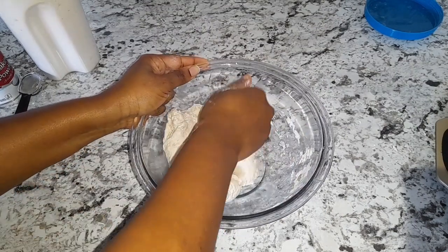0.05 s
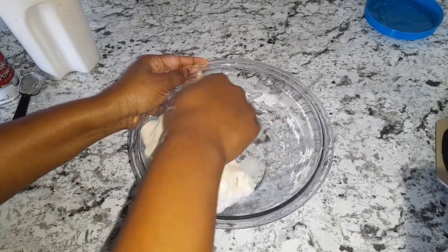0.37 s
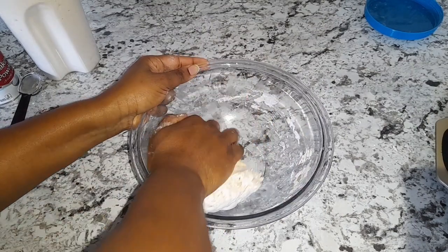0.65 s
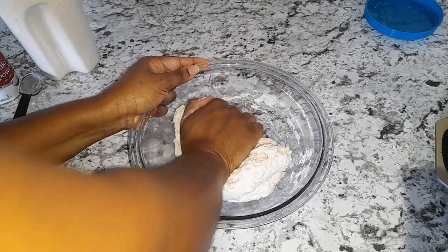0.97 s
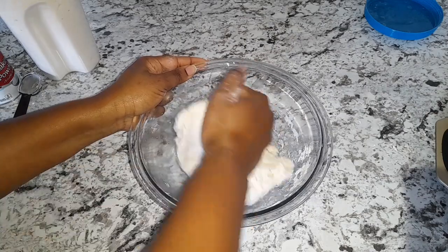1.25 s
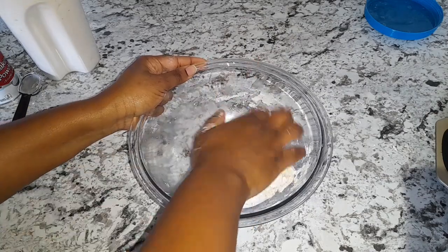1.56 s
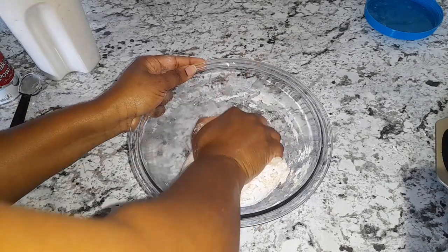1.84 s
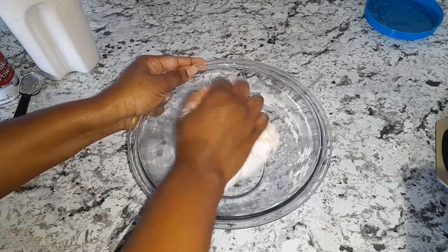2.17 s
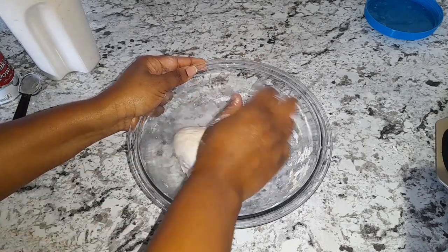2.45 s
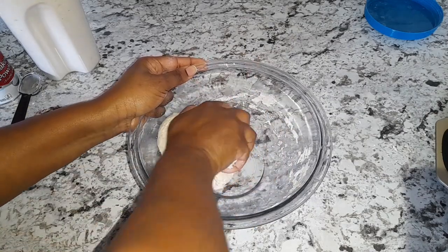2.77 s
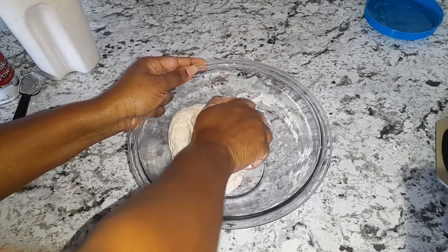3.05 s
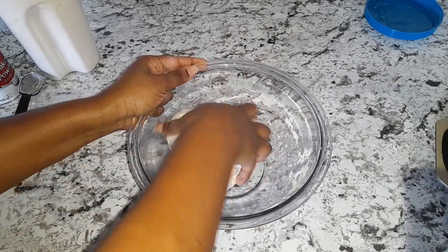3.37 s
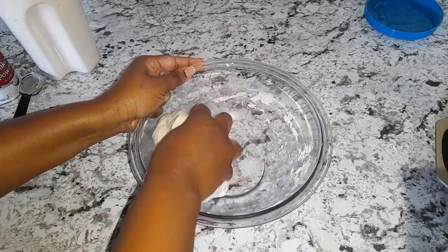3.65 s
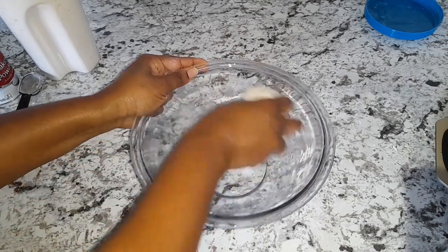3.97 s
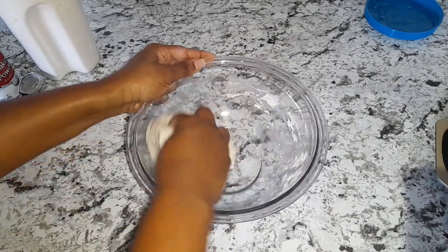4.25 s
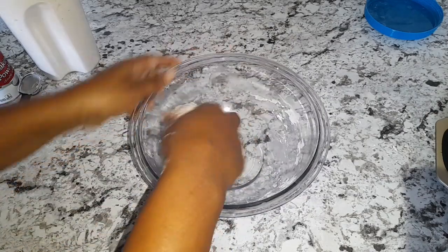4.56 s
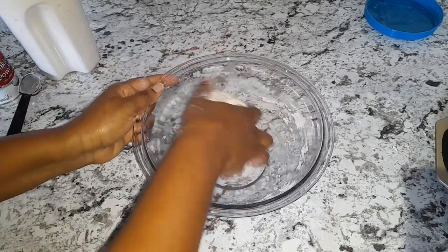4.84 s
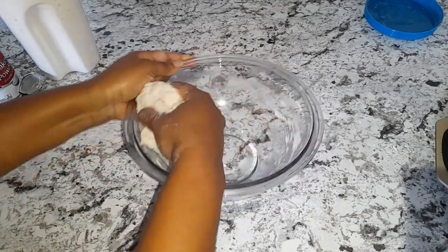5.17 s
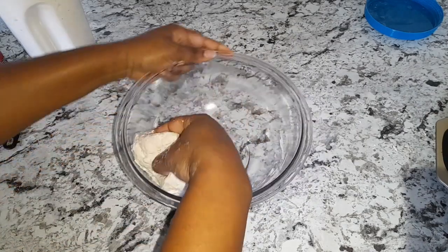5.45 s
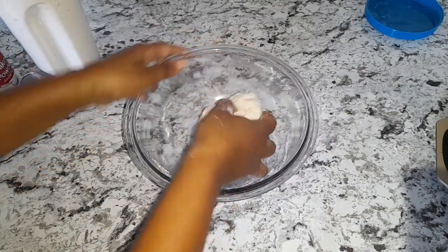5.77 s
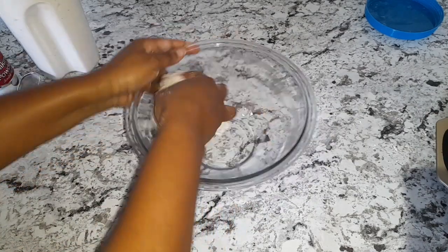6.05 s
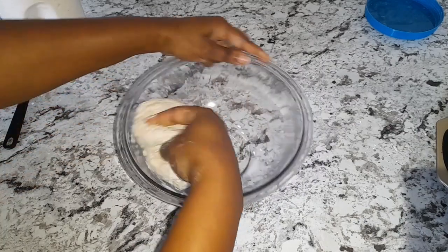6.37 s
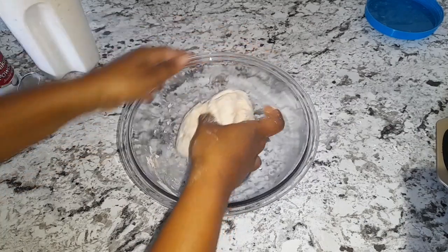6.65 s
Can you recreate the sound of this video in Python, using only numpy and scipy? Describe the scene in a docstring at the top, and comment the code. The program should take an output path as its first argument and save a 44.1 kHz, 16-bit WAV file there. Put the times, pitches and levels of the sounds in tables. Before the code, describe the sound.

Hands knead soft dough in a glass bowl, with dull thuds on the counter, floury rubbing and small sticky ticks.

```python
"""Kneading dough in a glass bowl

Floury skin rubs, scrapes and ticks on the glass; soft dough drags and peels off, close to a stereo mic.
The bowl creeps over a stone counter and thuds on it, slapping air from under the dough.
A slipping fingertip squeaks; the rim rings faintly when caught. Small kitchen, appliance humming."""
import sys
import numpy as np
from scipy import signal
from scipy.fft import rfft, irfft, next_fast_len
from scipy.io import wavfile
from scipy.ndimage import map_coordinates

SR = 44100
rng = np.random.default_rng(int(sys.argv[2]) if len(sys.argv) > 2 else 0)


def inscribe(sig):
    """Save sig as 16-bit PCM at rate SR to the path in sys.argv[1].

    A 1-D sig is mono; a 2-D sig holds one channel per row.
    Samples are clipped to [-1, 1] before scaling.
    """
    pcm = np.round(np.clip(np.atleast_2d(sig).T, -1, 1) * 32767)
    wavfile.write(sys.argv[1], SR, pcm.astype(np.int16))


N = 295470

# hand sliding dough over glass: (start [s], rise [s], fall [s], skin hiss [dB], dough drag [dB])
STROKES = [(0, 0.032, 0.47, -51.5, -59.5), (.14, 0.21, 0.17, -51.5, -61), (.5, 0.23, 0.12, -64, -64.5),
           (.76, 0.14, 0.36, -65, -72.5), (1.043, 0.039, 0.25, -50.5, -67), (1.32, 0.027, 0.11, -65, -84),
           (1.53, .04, 0.032, -67, -82), (1.647, .02, 0.077, -59, -63.5), (1.72, 0.019, 0.094, -64, -68),
           (1.805, 0.051, 0.3, -62, -62.5), (2.07, 0.017, 0.43, -56.5, -59), (2.74, 0.16, .16, -67, -86),
           (3.108, 0.049, 0.031, -46, -49.5), (3.15, 0.061, 0.085, -46.5, -55),
           (3.366, 0.0097, 0.16, -58, -66), (3.51, 0.1, 0.24, -54.5, -66), (3.63, 0.1, 0.12, -49.5, -60.5),
           (3.83, 0.24, 0.3, -52.5, -59.5), (4.17, 0.014, .03, -73, -57), (4.26, 0.24, 0.4, -61.5, -64.5),
           (4.79, 0.11, 0.15, -66.5, -69.5), (4.99, 0.13, 0.88, -60, -66.5),
           (5.599, 0.055, 0.047, -58, -55), (5.66, .1, 0.18, -68, -68.5),
           (5.88, 0.062, 0.092, -63.5, -68.5), (5.93, .19, 0.37, -61.5, -60), (6.29, .06, 0.19, -66, -56),
           (6.38, 0.1, 0.32, -66.5, -67.5)]
# dough peeling off: (release [s], pull [s], t60 [s], skin hiss [dB], dough drag [dB])
PEELS = [(1.164, 0.091, .31, -42.5, -44.5), (2.159, 0.076, 0.17, -38, -43),
         (2.955, 0.064, 0.32, -49.5, -71)]
SKIN_SPECTRUM = [(1470, -25), (2500, -11.5), (4260, -0.5), (4560, -1.5), (6510, -1), (7650, 0),
                 (13600, 4.5), (15000, 1.5), (15800, -51)]  # skin on glass: (frequency [Hz], level [dB])
DRAG_SPECTRUM = [(40, -9), (150, 10), (400, 0.5), (750, 6), (1250, 1), (1800, 0), (3100, -6), (5500, -10),
                 (10000, -28)]  # dough on glass: (frequency [Hz], level [dB])
SCRAPES = [(0, 0.043, 0.38, -64), (.51, 0.19, 0.15, -62), (1.82, 0.13, .2, -63), (2.2, 0.072, 0.093, -68),
           (2.45, 0.071, 0.15, -75), (3.415, 0.022, 0.084, -55), (3.55, 0.22, .1, -61.5),
           (4.8, .1, .12, -74), (6.3, 0.18, 0.44, -72.5)]  # bare skin on the wall: (start [s], rise [s], fall [s], level [dB])
WALL_MODES = [(1240, 130, -2), (2340, 940, -3), (3830, 460, -2)]  # glass damped by hand and dough: (frequency [Hz], width [Hz], level [dB])
SHIFTS = [(0, 0.49, -55.5), (0.776, 0.72, -57.5), (1.81, 0.21, -56.5), (2.2, 0.15, -64), (2.824, 0.26, -66),
          (3.53, 0.83, -54), (3.893, 0.19, -48.5), (4.535, 0.5, -57), (5.093, 0.29, -47.5),
          (5.88, 0.3, -54.5), (6.26, 0.24, -54)]  # bowl creeping: (start [s], length [s], level [dB])
RUMBLE_SPECTRUM = [(20, -25), (45, 11), (80, -13), (180, 4), (300, 7), (450, -3.5), (750, -10.5),
                   (1400, -24), (4000, -59)]  # bowl's foot on stone: (frequency [Hz], level [dB])
AIR_SPECTRUM = [(25, -36), (52, 4), (85, -15), (130, -8), (260, 2), (380, -6.5), (460, -3), (700, -9),
                (1100, -21), (1600, -29), (3500, -38.5), (8000, -37), (13500, -27.5), (15800, -47)]  # room air: (frequency [Hz], level [dB])
HUM_PARTIALS = [(60, -75), (120, -80.5), (240, -78.5), (283, -70.5), (465, -64), (700, -70)]  # appliance: (frequency [Hz], level [dB])
TICKS = [(.0712, -48, -38.5), (.2844, -33, -52), (.9462, -48, -63), (1.1495, -37, -41), (1.1557, -37, -31),
         (1.8455, -47, -44.5), (2.1535, -30, -32), (2.1565, -26, -29), (2.1616, -26, -26.5),
         (2.3977, -52, -68), (3.119, -40, -58), (3.1472, -35, -49), (4.0392, -36, -45), (4.1793, -52, -46),
         (4.9352, -46, -65), (5.0557, -64, -51), (5.7482, -45.5, -55), (6.5284, -44, -64)]  # flour and sticky dough letting go: (time [s], crack [dB], tap [dB])
CRACK_SPECTRUM = [(300, -11), (2600, -6.5), (15000, 10)]  # bright crack of dough: (frequency [Hz], level [dB])
TAP_SPECTRUM = [(300, -7), (1250, 4), (2600, -3.5), (4200, -8), (9000, -16)]  # dull tap on glass: (frequency [Hz], level [dB])
# landings, low bounce = soft contact: (time [s], level [dB], bounce [Hz], slap trim [dB], boom trim [dB])
LANDINGS = [(.685, -27, 228, -6, 3), (.711, -23.5, 327, -8, 1), (1.153, -44, 200, -9, 10),
            (1.66, -34, 182, -16, -8), (1.725, -45, 160, 3.5, 9), (2.145, -39.5, 261, -22, 8),
            (2.304, -52, 102, -12, 15), (3.001, -34, 219, -18, -1), (3.138, -39, 312, 1, -2),
            (3.2, -37.5, 155, -7, 4), (3.3746, -29.5, 177, -12.5, 6), (3.427, -26, 506, -7, 8),
            (3.502, -24, 210, -14.5, -1), (3.8193, -3, 345, -8.5, -6), (3.838, -22.5, 228, -22, 4),
            (3.9139, -26.5, 211, -19, 5), (4.429, -32, 225, -11.5, -3), (4.4604, -23.5, 342, -16, -8),
            (4.4856, -21, 230, -14.5, -3), (4.861, -39.5, 176, -17, 8), (5.3581, 1, 317, -9.5, -12),
            (5.387, -8, 200, -6, -5), (5.6201, -12.5, 310, -8.5, -3), (5.6639, -28.5, 156, -9.5, 9),
            (6.289, -37, 123, -20, 1)]
BOWL_MODES = [(181.3, 5.5, 0.18), (208.3, 6.5, 0.069), (292.5, 0.5, 0.11), (398.3, -5.5, 0.083),
              (477, -44, 0.175), (518.4, -6, 0.083), (616, -20, 0.081), (856, -44, .09),
              (1074, -18.3, 0.15), (1350, -17, 0.14)]  # loaded bowl on the counter: (frequency [Hz], level [dB], t60 [s])
COUNTER_MODES = [(45.1, -21, 0.41), (57.3, -11.5, 0.201), (105.8, -24.5, 0.41)]  # counter and cabinet: (frequency [Hz], level [dB], t60 [s])
SLAP_SPECTRUM = [(30, -29), (100, 0), (350, -3.5), (550, -6.5), (800, -15), (1500, -24.5), (3000, -36.5),
                 (6000, -41), (10000, -46), (15000, -52)]  # air from under the dough: (frequency [Hz], level [dB])
SQUEAKS = [(2.977, -37, 4050), (3.586, -44.5, 3750)]  # fingertip slips: (time [s], level [dB], pitch [Hz])
# fingers catching the rim: (time [s], level [dB], t60 left by the grip [ratio], contact corner [Hz])
RIM_CATCHES = [(3.428, -51.5, 0.17, 6000), (4.454, -62, 0.45, 7000), (4.495, -60, 0.59, 4050),
               (4.562, -60.5, 0.64, 9000), (6.648, -61, 1, 1100)]
GLASS_MODES = [(1320, -5.5, 0.8), (2486, -2.5, 0.67), (3730, -2, 0.39), (5380, 3, 0.42), (7300, -3, 0.27),
               (9050, -8, .2)]  # free glass wall: (frequency [Hz], level [dB], t60 [s])
ROOM_DECAY = [(100, 0.41), (300, 0.53), (1000, 0.53), (4000, 0.48), (14000, 0.088)]  # kitchen reverb: (frequency [Hz], t60 [s])
ROOM_GAIN = [(50, -5.5), (170, -13), (320, -9.5), (1000, -6.5), (3000, -3.5), (6000, -10), (14000, -5.5)]  # reverb over its input: (frequency [Hz], gain [dB])
MIC_COHERENCE = [(60, 0.91), (290, 0.89), (640, 0.36), (1400, 0.087), (3000, 0.19), (15000, 0)]  # left-right likeness: (frequency [Hz], correlation [ratio])
MIC_BALANCE = [(60, -3.5), (200, -0.5), (600, 2), (1200, -1), (4400, 0), (8000, -0.5), (15000, 5.5)]  # port colour: (frequency [Hz], left minus right [dB])


def amp(db):
    """Decibels to gain."""
    return 10 ** (np.asarray(db) / 20)


def unit(x):
    """Scale to rms 1."""
    return x / np.sqrt(np.mean(x ** 2) + 1e-20)


def along(points, hz):
    """Read (Hz, value) points on a log axis."""
    knots_hz, values = np.transpose(points)
    return np.interp(np.log(hz + 1), np.log(knots_hz + 1), values)


def fade(t, t60_s):
    """Exponential decay, 60 dB in t60_s."""
    return np.exp(-np.log(1000) * t / t60_s)


def add(track, start_s, sound):
    """Mix a sound in at start_s."""
    part = track[..., round(start_s * SR):][..., :sound.shape[-1]]
    part += sound[..., :part.shape[-1]]


def wobble(rate_hz):
    """Smooth random curve, knots at rate_hz."""
    knots = rng.standard_normal(int(N * rate_hz / SR) + 4)
    return map_coordinates(knots, [np.arange(N) * rate_hz / SR])


def filtered(x, response):
    """Apply a gain given as a function of Hz."""
    n = x.shape[-1]
    padded = next_fast_len(n + 8192)
    return irfft(rfft(x, padded) * response(np.fft.rfftfreq(padded, 1 / SR)), padded)[..., :n]


def spread(pair, spectrum=((100, 0),)):
    """Two unrelated signals to coloured stereo, rms 1: bass alike, treble apart."""
    def response(hz):
        angle = np.arccos(np.clip(along(MIC_COHERENCE, hz), -1, 1)) / 2
        return amp(along(spectrum, hz)) * [np.cos(angle), np.sin(angle)]
    mid, side = filtered(pair, response)
    return unit(np.array([mid + side, mid - side]))


def noise(n=N):
    """Two unrelated white noises."""
    return rng.standard_normal((2, n))


def slips(rate_hz):
    """Sparse impulses of random size, rms 1."""
    return unit((rng.random(N) < rate_hz / SR) * noise())


def grains(rate_hz, grit):
    """Tiny slips over a smooth rush."""
    return grit * slips(rate_hz) + unit(noise())


def ring(modes, t, scatter_db, t60_scale=1):
    """Decaying modes, strengths drawn anew."""
    return sum(amp(db + scatter_db * rng.normal()) * np.sin(2 * np.pi * hz * t)
               * fade(t, t60_s * t60_scale) for hz, db, t60_s in modes)


def softened(modes, corner_hz):
    """A soft, long contact barely drives modes above its corner."""
    return [(hz, db - 10 * np.log10(1 + (hz / corner_hz) ** 4), t60_s) for hz, db, t60_s in modes]


def hand_speed(rise_s, fall_s, ease_power=1.56):
    """One rub: the hand picks up speed, then eases off."""
    t = np.arange(SR) / SR
    pick_up = np.sin(np.pi / 2 * np.clip(t / rise_s, 0, 1))
    ease_off = np.sin(np.pi / 2 * np.clip((rise_s + fall_s - t) / fall_s, 0, 1))
    return pick_up * ease_off ** ease_power


def friction(swell_db=17):
    """Skin and dough envelopes: strokes follow hand speed, peels swell until the dough lets go."""
    power, t = np.zeros((2, N)), np.arange(SR) / SR
    for start_s, rise_s, fall_s, skin_db, dough_db in STROKES:
        add(power, start_s, np.outer(amp([skin_db, dough_db]), hand_speed(rise_s, fall_s)) ** 2)
    for release_s, pull_s, t60_s, skin_db, dough_db in PEELS:
        swell = amp(swell_db * np.minimum(t / pull_s - 1, 0))
        tension = swell * fade(np.maximum(t - pull_s, 0), t60_s)
        add(power, release_s - pull_s, np.outer(amp([skin_db, dough_db]), tension) ** 2)
    return np.sqrt(power)


def rubbing(drag_trim_db=0.5, sticky_db=-10, rest_db=-82):
    """Floury skin hisses on the glass, dough drags with a duller sound; both judder together."""
    skin, dough = friction()
    skin = np.hypot(skin, amp(rest_db))  # skin never lies quite still
    judder = unit(amp(wobble(170) + 1.02 * wobble(30)))
    sticky = amp(sticky_db) * slips(rate_hz=70)
    hiss = spread(grains(rate_hz=1500, grit=0.69) + sticky, SKIN_SPECTRUM)
    drag = spread(grains(rate_hz=500, grit=0.58), DRAG_SPECTRUM)
    return judder * (skin * hiss + amp(drag_trim_db) * dough * drag)


def scraping():
    """Slipping skin drives the damped wall resonances: a hollow rasp."""
    def wall(hz):
        return sum(amp(db) * 1j * hz * width_hz / (mode_hz ** 2 - hz ** 2 + 1j * hz * width_hz)
                   for mode_hz, width_hz, db in WALL_MODES)
    envelope = np.zeros(N)
    for start_s, rise_s, fall_s, db in SCRAPES:
        add(envelope, start_s, amp(db) * hand_speed(rise_s, fall_s))
    drive = spread(grains(rate_hz=500, grit=0.65))
    return envelope * unit(filtered(drive, wall))


def shifting(uneven_db=2):
    """The bowl's foot creeps over stone: a low, uneven rumble."""
    speed = np.zeros(N)
    for start_s, length_s, db in SHIFTS:
        add(speed, start_s, amp(db) * np.sqrt(np.hanning(int(length_s * SR))))
    uneven = amp(uneven_db * wobble(25))
    rumble = spread(grains(rate_hz=140, grit=0.57), RUMBLE_SPECTRUM)
    return speed * unit(uneven * rumble)


def appliance():
    """Hum, slightly unsteady in level and phase."""
    t = np.arange(N) / SR
    return sum(amp(db + wobble(5)) * np.sin(2 * np.pi * hz * t + hz / 400 * wobble(12))
               for hz, db in HUM_PARTIALS)


def room_air(level_db=-58.5):
    """Steady rush of moving air."""
    return amp(level_db) * spread(noise(), AIR_SPECTRUM)


def ticks(trim_db=-2, crack_t60_s=0.014, tap_t60_s=0.01):
    """Sharp releases: the dough cracks and taps the damped glass."""
    out, t = np.zeros((2, N)), np.arange(SR // 20) / SR
    for time_s, crack_db, tap_db in TICKS:
        crack = amp(crack_db) * spread(noise(len(t)), CRACK_SPECTRUM) * fade(t, crack_t60_s)
        tap = amp(tap_db) * spread(noise(len(t)), TAP_SPECTRUM) * fade(t, tap_t60_s)
        add(out, time_s, amp(trim_db) * (crack + tap))
    return out


def thuds(push_s=0.0059, boom_rise_s=0.0091, slap_rise_s=0.0004, bounce_db=3, ring_db=-13, slap_db=-2):
    """A landing bounces and rings the bowl, booms the counter and slaps air from under the dough."""
    out, t = np.zeros((2, N)), np.arange(SR // 2) / SR
    push = 1 - np.exp(-(t / push_s) ** 2)  # dough keeps pushing, so motion builds
    slap = amp(slap_db) * fade(t, t60_s=0.078) * (1 - np.exp(-t / slap_rise_s))
    slap_power = np.zeros(N)
    for time_s, db, bounce_hz, slap_trim_db, boom_trim_db in LANDINGS:
        bounce = amp(bounce_db) * np.sin(2 * np.pi * bounce_hz * t) * fade(t, t60_s=0.046)
        bowl = amp(ring_db) * ring(softened(BOWL_MODES, 2 * bounce_hz), t, scatter_db=0.5)
        boom = amp(boom_trim_db) * ring(COUNTER_MODES, t, scatter_db=1.5)
        boom *= 1 - np.exp(-t / boom_rise_s)
        add(out, time_s, amp(db) * (boom - push * (bounce + bowl)))
        add(slap_power, time_s, (amp(db + slap_trim_db) * slap) ** 2)
    return out + np.sqrt(slap_power) * spread(noise(), SLAP_SPECTRUM)


def squeaks(waver=0.045, rise_s=0.00053, t60_s=0.024):
    """A fingertip slips on glass: a tiny wavering tone."""
    out, t = np.zeros((2, N)), np.arange(SR) / SR
    envelope = fade(t, t60_s) * (1 - np.exp(-t / rise_s))
    for time_s, db, hz in SQUEAKS:
        pitch_hz = hz * (1 + waver * wobble(740)[:SR])
        phase = 2 * np.pi * np.cumsum(pitch_hz) / SR
        add(out, time_s, amp(db) * envelope * (np.sin(phase) + 0.15 * np.sin(2 * phase)))
    return out


def rim():
    """A finger catches the rim; the glass rings, damped by the holding hand."""
    out, t = np.zeros((2, N)), np.arange(SR) / SR
    for time_s, db, t60_scale, corner_hz in RIM_CATCHES:
        modes = softened(GLASS_MODES, corner_hz)
        channels = [ring(modes, t, scatter_db=5.5, t60_scale=t60_scale) for _ in range(2)]
        add(out, time_s, amp(db) * np.array(channels))
    return out


def kitchen(x, onset_s=0.0023):
    """Diffuse reverb; each frequency dies at its own rate."""
    hz, frame_s, bands = signal.stft(spread(noise(SR)), SR, nperseg=256)
    t60_s = along(ROOM_DECAY, hz)[:, None]
    _, tail = signal.istft(bands * fade(frame_s, t60_s) / np.sqrt(t60_s), SR, nperseg=256)
    t = np.arange(tail.shape[1]) / SR
    tail *= 1 - np.exp(-(t / onset_s) ** 2)
    tail = filtered(tail / np.linalg.norm(tail[0]), lambda hz: amp(along(ROOM_GAIN, hz)))
    return signal.fftconvolve(x, tail, axes=1)[:, :N]


def scene(hands_send_db=-6):
    """Bowl and hands close by, the kitchen around them."""
    blows = thuds()
    hands = rubbing() + scraping() + ticks() + rim() + squeaks()
    room_send = blows + amp(hands_send_db) * hands
    return blows + hands + shifting() + kitchen(room_send) + appliance() + room_air()


def record(dry, low_hz=35, top_hz=15800):
    """The two mic ports differ in colour; deep bass and top are cut."""
    dry = signal.sosfilt(signal.butter(6, low_hz, "highpass", fs=SR, output="sos"), dry)
    return filtered(dry, lambda hz: amp(np.outer([0.5, -0.5], along(MIC_BALANCE, hz))) * (hz < top_hz))


dry = scene()
out = record(dry)
inscribe(out)
```